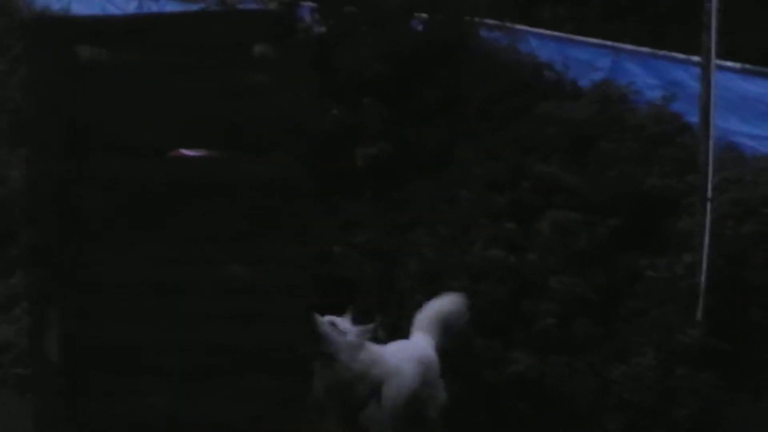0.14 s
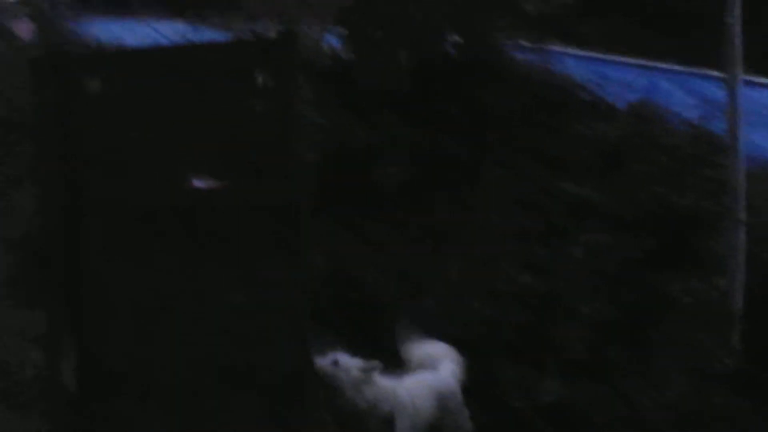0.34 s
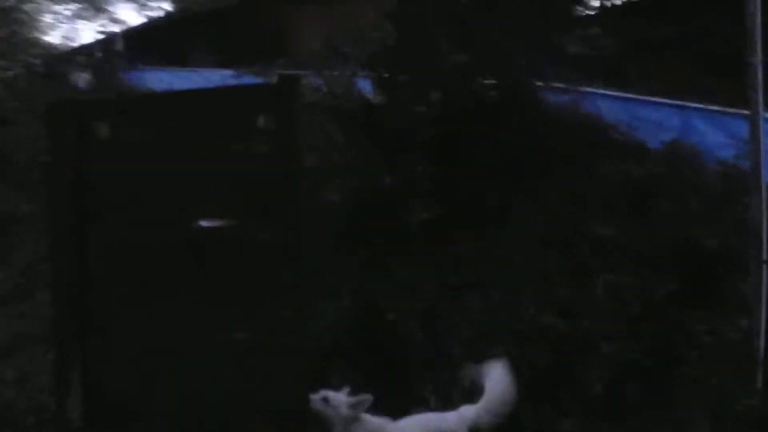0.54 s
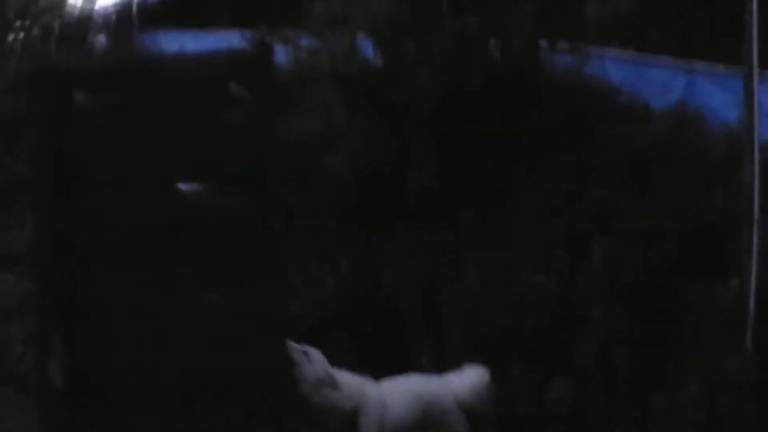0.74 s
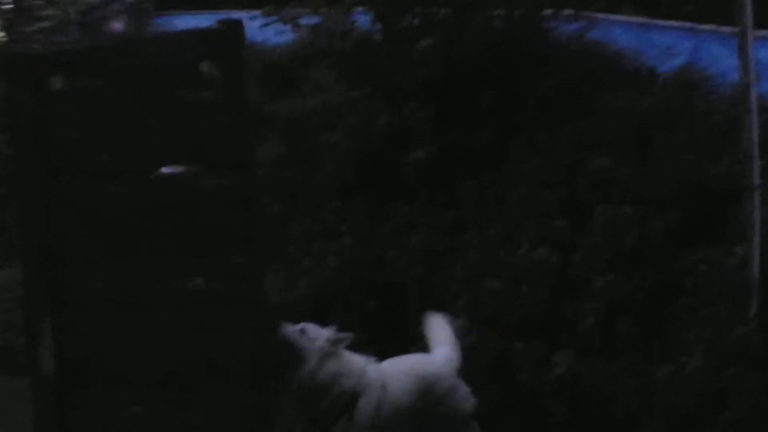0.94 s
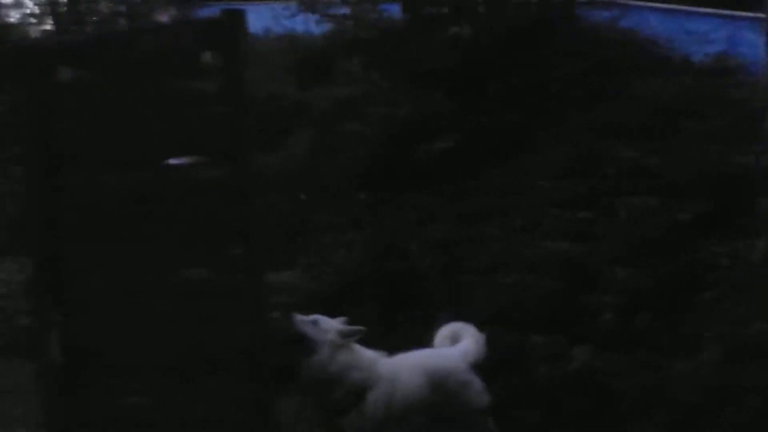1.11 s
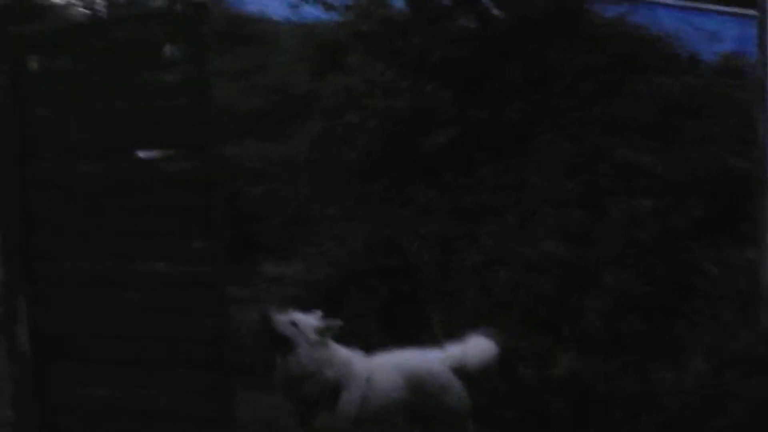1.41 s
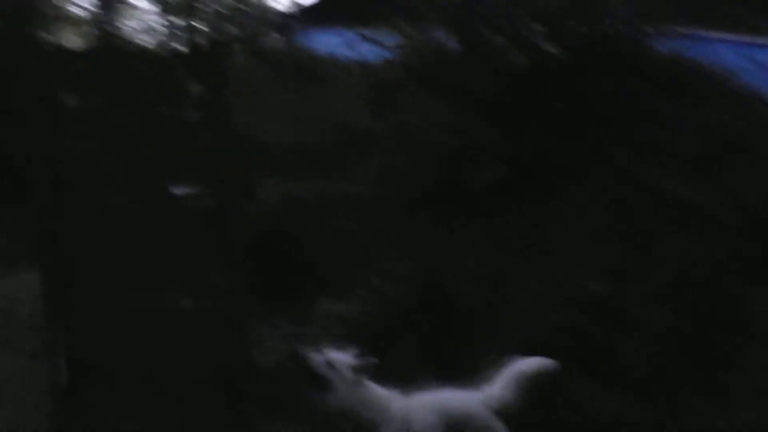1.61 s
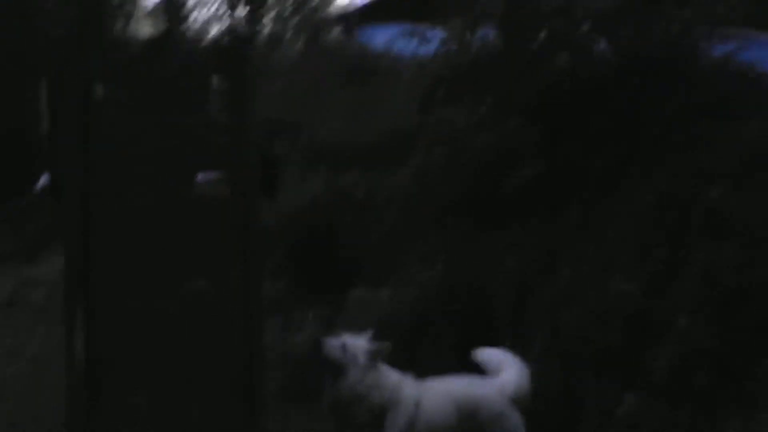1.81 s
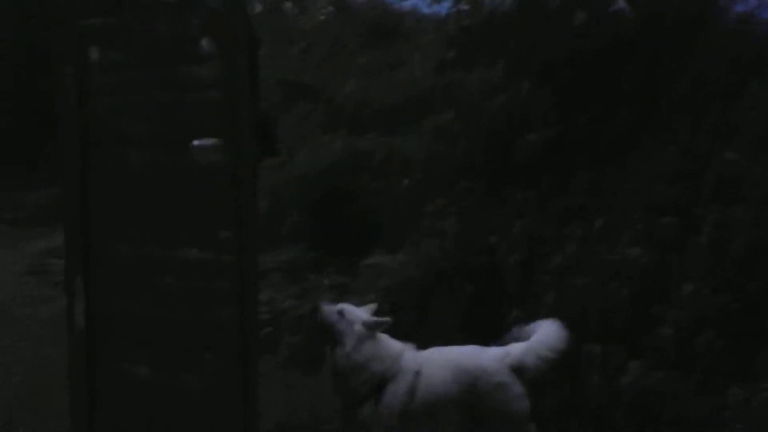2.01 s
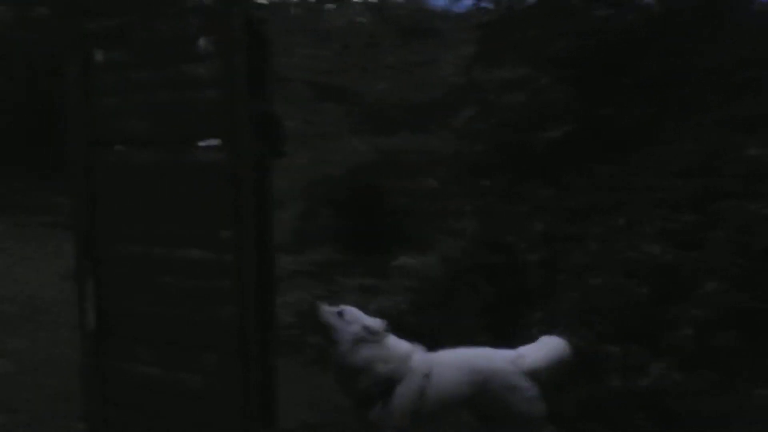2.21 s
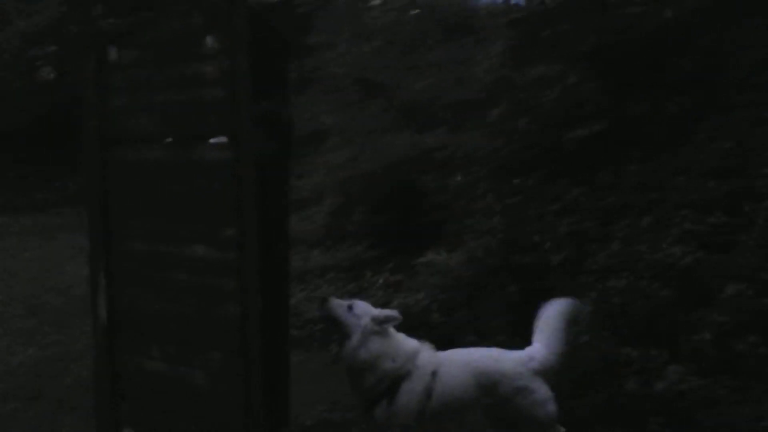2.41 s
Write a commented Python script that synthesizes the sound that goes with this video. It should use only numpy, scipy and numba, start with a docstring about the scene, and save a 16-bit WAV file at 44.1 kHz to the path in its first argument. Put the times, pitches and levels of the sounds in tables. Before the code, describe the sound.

Three strong, rough-edged barks from a big dog some way off, two close together and one later, reverberating from fences and trees; near the microphone there are dry clicks, fabric scuffs and a brief zip before the last bark.

```python
"""Three barks in a yard

A large dog barks three times at dusk; fences and trees throw the barks back as echoes and a diffuse tail.
Each bark is vocal fold pulses ringing throat and mouth: slow and rough, then clearer, falling as the jaw closes.
Near the microphone cloth rustles (noise swells), clicks (damped tones) and zips (a buzz of ribs), with dull bumps.
Low coloured noise lies behind it all; the recorder's limiter flattens the barks."""
import sys
import numpy as np
from scipy import signal
from scipy.fft import rfft, irfft
from scipy.io import wavfile
from scipy.ndimage import uniform_filter1d
from numba import njit

SR = 44100
rng = np.random.default_rng(int(sys.argv[2]) if len(sys.argv) > 2 else 0)


def store_pcm(level_fs):
    """Save levels as 16-bit WAV."""
    pcm = np.round(np.clip(level_fs, -1, 1) * 32767).astype(np.int16)
    wavfile.write(sys.argv[1], SR, np.atleast_2d(pcm).T)


N = 112454
T = np.arange(N) / SR


def from_db(db):
    """Decibels to gain."""
    return 10 ** (np.asarray(db) / 20)


def rms_one(x):
    """Scale to unit power."""
    return x / np.sqrt(np.mean(x ** 2) + 1e-20)


def even(x, size=500):
    """Hold the short-term power near one; size is the averaging window in samples."""
    power = uniform_filter1d(uniform_filter1d(x * x, size), size)
    return x / np.sqrt(np.abs(power) + 1e-12)


def cut(x, hz, kind, order=2):
    """Butterworth filter."""
    return signal.sosfilt(signal.butter(order, hz, kind, fs=SR, output="sos"), x)


def colour(x, points):
    """Shape the spectrum by a (hz, db) curve, interpolated over log frequency."""
    hz, db = np.transpose(points)
    f = np.maximum(np.fft.rfftfreq(2 * N, 1 / SR), 1)
    gain = from_db(np.interp(np.log(f), np.log(hz), db))
    return irfft(rfft(x, 2 * N) * gain)[:N]


def white(size=N):
    """White noise of unit power."""
    return rng.standard_normal(size)


def noise(points):
    """Coloured noise of unit power."""
    return rms_one(colour(white(), points))


def slow_noise(hz, size=N):
    """Unit-power random drift below hz; the end is taken, where the filter has settled."""
    return rms_one(cut(white(), hz, "low"))[-size:]


def add(out, s, x):
    """Mix a sound in at a time in seconds."""
    i = int(s * SR)
    out[i:i + len(x)] += x[:N - i]


def background():
    """Steady evening background: low-heavy coloured noise."""
    # spectrum of the evening air: hz, level_db
    evening = [(25, -21), (70, -6), (260, -1), (450, -4.5), (1800, -16.5), (2700, -24), (6800, -37),
               (8000, -48.5), (15000, -44)]
    return from_db(-47.5) * noise(evening)


def clicks():
    """Each dry click is a heavily damped body tone minus a usually brighter, damped snap."""
    # clicks: start_s, level_db, body_hz, snap_hz, snap_db (against the body)
    hits = [(.064,-18,2430,3960,-1.5), (0.0989,-10.5,1170,2600,-14), (0.583,-16.5,1455,3840,-14),
            (.626,-28,1950,4200,-2), (1.1915,-8,750,2800,-3.5), (2.058,-3.5,1195,3870,2.5),
            (2.132,-12,1910,2400,-6.5)]
    body_cycles, snap_cycles = 1.54, 2.77   # cycles in which each tone falls by 30 dB
    out, t = np.zeros(N), T[:SR // 20]
    for s, db, body_hz, snap_hz, snap_db in hits:
        body = np.sin(2 * np.pi * body_hz * t) * from_db(-30 * t * body_hz / body_cycles)
        snap = np.sin(2 * np.pi * snap_hz * t) * from_db(-30 * t * snap_hz / snap_cycles)
        add(out, s, from_db(db) * (body - from_db(snap_db) * snap))
    return cut(out, [250, 7000], "band")


def rustles(grain_db=6.5):
    """Cloth friction: short swells of grainy band noise, with hiss mixed in."""
    # rustles and scuffs: peak_s, attack_s, decay_s, level_db, band_hz, hiss_db (against the grains)
    swells = [(0.096, 0.0027, 0.0075, -35.5, 3300, -39.5), (0.119, 0.023, 0.0063, -32.5, 2810, -4.5),
              (0.147, 0.0038, 0.0031, -30.5, 4200, -7), (0.167, 0.027, 0.038, -43, 2690, 3),
              (0.989, 0.051, 0.062, -54.5, 2960, 4.5), (1.603, 0.025, 0.023, -42.5, 1530, -17),
              (1.841, 0.061, 0.23, -55.5, 2200, 4.5), (2.058, .004, 0.027, -31.5, 2960, -9),
              (2.095, 0.0042, 0.0085, -28.5, 2320, -19), (2.117, 0.0078, 0.013, -19.5, 2090, -28),
              (2.138, 0.00096, 0.0073, -19.5, 2870, -36)]
    # spectrum of the hiss: hz, level_db
    hiss_curve = [(2000, 10.5), (5000, 5), (9000, -8.5), (16000, -19)]
    out, hiss = np.zeros(N), noise(hiss_curve)
    for s, attack, decay, db, hz, hiss_db in swells:
        grain_size = np.repeat(white(N // 32 + 1), 32)[:N]   # a new strength every 32 samples
        grains = white() * from_db(grain_db * grain_size)
        band = [hz / 2, min(hz * 1.347, SR / 3)]
        friction = rms_one(cut(grains, band, "band", order=3))
        fade = np.where(T < s, ((s - T) / attack) ** 2, (T - s) / decay)
        swell = np.exp(-np.minimum(fade, 20))
        out += from_db(db) * swell * (friction + from_db(hiss_db) * hiss)
    return out


def yard(x):
    """Reflections: a few distinct smeared echoes and a diffuse tail that builds and dies away."""
    # echoes, before the colouring: delay_s, level_db
    echoes = [(0.046,-9), (.114,-21), (.15,-23), (.207,-28), (.425,-37)]
    # colour of the reflections: hz, level_db
    reflection_curve = [(60, -5.5), (150, 11), (450, -10), (950, 0), (2000, -8), (6000, -4.5),
                        (12000, -34.5)]
    tail_db, t60_s, build_s, smear_s = -21.5, 1.23, 0.12, 0.0033
    tail = rms_one(white() * from_db(-60 * T / t60_s) * (1 - np.exp(-(T / build_s) ** 2)))
    response = from_db(tail_db) * tail / np.sqrt(N)
    for s, db in echoes:
        smear = rms_one(white() * np.exp(-np.minimum(T / smear_s, 20))) / np.sqrt(N)
        add(response, s, from_db(db) * ((T == 0) + 0.34 * smear))
    return colour(signal.fftconvolve(x, response)[:N], reflection_curve)


def folds(pitch, rough):
    """Vocal fold pulses that wander in pitch, uneven in timing and strength, with air on each cycle."""
    # amounts at full roughness: cycles of timing slip, dB of unevenness, then plain shares
    jitter, shimmer_db, air_share, wander_share, doubling = 0.08, 6, 2.75, 0.09, 0.33
    wander = slow_noise(119, len(pitch))
    cycles = np.cumsum(pitch * np.exp(wander_share * rough * wander)) / SR
    slip, size = rng.standard_normal((2, 200))   # one draw per cycle
    slips = np.interp(cycles, np.arange(len(slip)), slip)
    phase = np.maximum.accumulate(cycles + jitter * rough * slips)
    k = np.round(phase).astype(int)
    offset = (phase - k) * SR / pitch   # samples from the nearest pulse
    alternation = 1 + doubling * rough * (-1) ** k   # every other pulse is stronger
    strength = from_db(shimmer_db * rough * size[k]) * alternation
    pulse = np.sinc(offset / 2) * np.exp(-(offset / 10) ** 2)
    pulses = pulse * strength * np.sqrt(SR / pitch / 2)   # similar power at any pitch
    air = white()[:len(pitch)] * (1 + np.cos(2 * np.pi * phase)) / 2
    return air_share * rough * air - pulses


@njit
def resonate(x, hz, width):
    """Resonance with a moving centre and about unit gain on top."""
    y, r = np.zeros(len(x)), np.exp(-np.pi * width / SR)
    for i in range(2, len(x)):
        drive = (1 - r * r) / 2 * (x[i] - x[i - 2])
        y[i] = drive + 2 * r * np.cos(2 * np.pi * hz[i] / SR) * y[i - 1] - r * r * y[i - 2]
    return y


def disperse(x, hz, width):
    """All-pass: frequencies near hz linger, spreading each pulse in time."""
    r = np.exp(-np.pi * width / SR)
    a = [1, -2 * r * np.cos(2 * np.pi * hz / SR), r * r]
    return signal.lfilter(a[::-1], a, x)


def bark(rows, scale, closes_s, fall, rasp_db):
    """Fold pulses ring the throat and mouth; the mouth resonances sink and dull as the jaw closes."""
    # mouth resonances before scaling and closing: centre_hz, width_hz, level_db
    resonances = [(1315,154,5), (1753,117,4), (2112,137,3)]
    # spectrum of the rasp: hz, level_db
    rasp_curve = [(600, -42), (2400, 1), (3900, 5.5), (6500, -6.5), (8500, -41), (16000, -24)]
    throat_width_hz, voice_low_hz = 203, 190
    closing_s, closing_db_per_khz = 0.02, 5.5
    chest_hz, chest_db, chest_s = 162, -12, 0.021

    s, *columns = np.transpose(rows)
    t = np.arange(int((s[-1] - s[0]) * SR)) / SR
    pitch, rough, db, throat_hz, open_db = [np.interp(t + s[0], s, c) for c in columns]
    closing = np.clip((t + s[0] - closes_s) / closing_s, 0, 1)   # jaw: 0 open, 1 closed
    source = folds(pitch, np.clip(rough, 0, 1))
    shape = scale * (1 - fall * closing)

    throat = resonate(source, throat_hz, throat_width_hz)
    throat = resonate(throat, throat_hz, throat_width_hz * 2)
    throat = cut(throat, voice_low_hz, "high", order=3)

    mouth = np.zeros(len(t))
    for k, (hz, width, level_db) in enumerate(resonances):
        gain = from_db(level_db - closing_db_per_khz * closing * hz / 1000)
        mouth += (-1) ** k * gain * resonate(source, hz * shape, width)
    mouth = cut(mouth, 2267 * scale, "low", order=10)
    mouth = cut(mouth, 650, "high", order=3)
    for hz, width, _ in resonances:
        mouth = disperse(mouth, hz, 2 * width)

    rasp = cut(source, 2080, "low", order=4) + 1.2 * white()[:len(t)]
    rasp = even(colour(rasp, rasp_curve)[:len(t)])
    rasp = rasp * from_db(2 * slow_noise(119 / 2, len(t)))   # the rasp comes in bursts

    # puff of air that opens the bark
    chest = rms_one(cut(white()[:len(t)], [chest_hz / 2, chest_hz * 2], "band", order=3))
    puff = from_db(chest_db) * np.exp(-(t / chest_s) ** 2) * chest
    voice = even(even(throat) + from_db(open_db) * even(mouth))
    return from_db(db) * (cut(voice + from_db(rasp_db) * rasp, voice_low_hz, "high") + puff)


def barking():
    """Three barks, each with its own pitch path, throat path and jaw movement."""
    # breakpoints of each bark: time_s, pitch_hz, roughness (0-1), level_db, throat_hz, mouth_db (against throat)
    first_bark = [(.232,124,0.25,-26.5,573,-8), (0.242,179.8,0.54,-21.5,580,-3.5),
                  (0.256,280.3,0.43,-10.5,580,1.5), (.271,339,.45,-5,648,-3.5),
                  (.286,412.5,0.21,-9,715,3.5), (.305,477.3,0.02,-0.5,660,-7), (.32,490.5,0.08,-2,540,-1.5),
                  (0.342,476.2,0.12,-2,477,-11), (.354,461.8,0.8,-5,527,0.5), (.38,423.4,0.7,-17.5,460,-3),
                  (0.442,214.6,0.7,-31.5,390,-8.5)]
    second_bark = [(.783,133.3,0.3,-29.5,545,-0.5), (.806,273.5,0.47,-13.5,556,1.5),
                   (.822,312.5,0.67,-8.5,542,-2.5), (.839,412,0.78,-12.5,704,7.5),
                   (.865,447.6,.25,-6.5,790,-3.5), (.88,468,0.34,-7,574,1), (0.91,488,0.55,-7,510,-1),
                   (0.927,494,0.71,-16.5,500,-6), (.985,301.3,0.96,-31,394,-8)]
    third_bark = [(2.149,210.3,0.21,-22,568,-1), (2.164,290,0.37,-13.5,556,-3),
                  (2.176,303.8,0.51,-6.5,546,0), (2.189,378.8,0.26,-10,676,1.5),
                  (2.21,458.9,0.027,-8.5,630,5), (2.229,484,0.017,-4,650,1),
                  (2.256,475.1,0.061,-2.5,575,-1.5), (2.268,419.6,0.78,-9.5,556,11),
                  (2.284,349,0.38,-12.5,520,9.5), (2.297,292.3,0.89,-25,443.4,-8),
                  (2.347,207.4,0.95,-28,374.4,-11.5)]
    # mouth of each bark: resonance scale, jaw_closes_s, share by which resonances then fall, rasp_db
    mouths = [(0.991,.32,0.013,-30.5), (0.927,0.867,.08,-32), (0.986,2.252,0.32,-32)]
    dog = np.zeros(N)
    for rows, mouth in zip((first_bark, second_bark, third_bark), mouths):
        add(dog, rows[0][0], bark(rows, *mouth))
    return dog


def bumps():
    """Dull knocks: short bell-shaped swells of low band noise."""
    # bumps: peak_s, length_s, level_db, band_hz
    knocks = [(1.585, 0.06, -44.5, 262), (2.114, 0.0057, -21.5, 190)]
    out = np.zeros(N)
    for s, length, db, hz in knocks:
        swell = np.exp(-np.minimum(((T - s) / length) ** 2, 20))
        thud = even(cut(white(), [hz / 2, hz * 1.58], "band", order=4))
        out += from_db(db) * swell * thud
    return out


def fabric_zip():
    """Ribbed fabric passes an edge: a tone at the rib rate, which follows the speed of the rub."""
    # path of the zip: time_s, ribs_per_s (before the unevenness), level_db
    rub = [(2.054,3100,-33), (2.056,3250,-19.5), (2.059,4400,-29), (2.07,2700,-28), (2.081,1940,-39)]
    s, rate, db = np.transpose(rub)
    uneven = 1 + 0.047 * slow_noise(880)
    ribs = np.cumsum(np.interp(T, s, rate) * uneven) / SR
    level = from_db(np.interp(T, s, db, left=-200, right=-200))
    return level * np.sqrt(2) * np.sin(2 * np.pi * ribs)


def scene():
    """The dog, the small near sounds, the reflections of both and the evening background."""
    dog = barking()
    near = clicks() + rustles() + fabric_zip() + bumps()
    reflections = yard(dog + 0.19 * near)   # near sounds reach the yard more weakly
    return (dog + near + reflections + background())[None]


def record(dry):
    """A limiter ducks loud sounds and recovers; peaks are rounded, the deep bass and the top are cut."""
    limit_db, release_db_per_s, attack_s, ceiling = -13.5, 75.5, 0.0077, 0.73
    level = 10 * np.log10(np.abs(uniform_filter1d(dry[0] ** 2, size=300)) + 1e-12)
    release = release_db_per_s * T
    over = np.maximum.accumulate(np.maximum(level - limit_db, 0) + release) - release
    r = np.exp(-1 / (attack_s * SR))
    ducking_db = signal.lfilter([1 - r], [1, -r], over)
    x = dry * from_db(-ducking_db)
    x = x / (1 + (x / ceiling) ** 8) ** (1 / 8)   # rounds peaks towards the ceiling
    x = cut(x, 45, "high")
    return signal.sosfilt(signal.cheby2(12, 60, 15800, fs=SR, output="sos"), x)


dry = scene()
out = record(dry)
store_pcm(out)
```